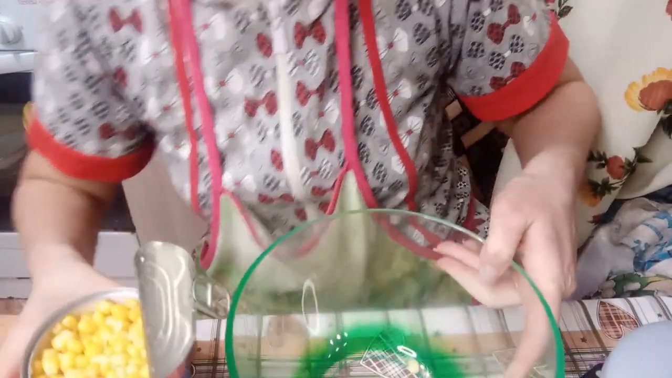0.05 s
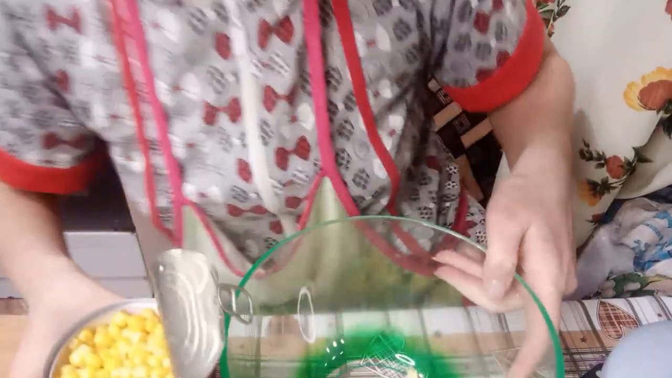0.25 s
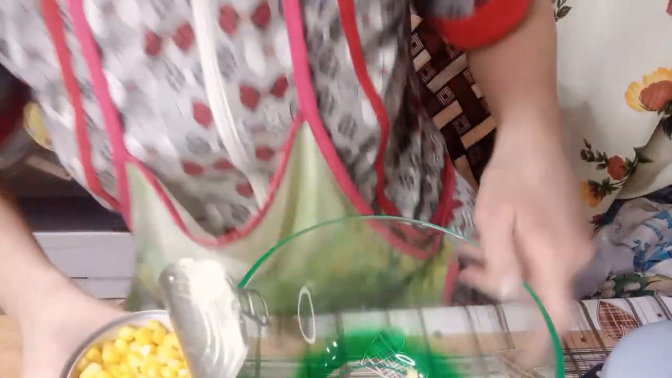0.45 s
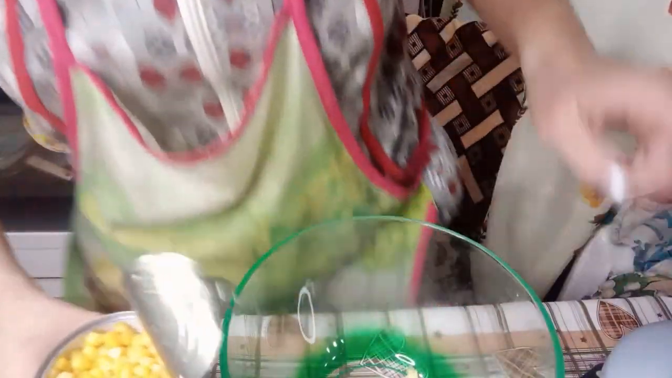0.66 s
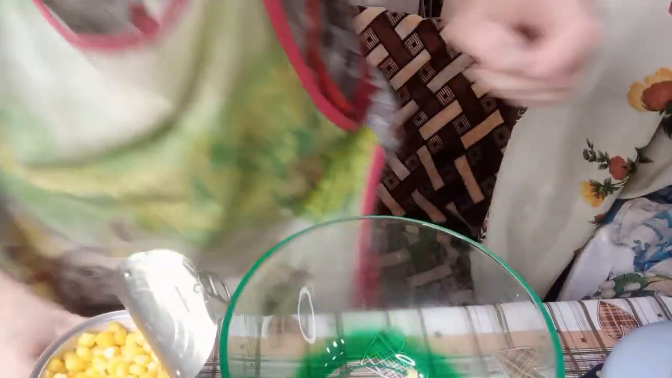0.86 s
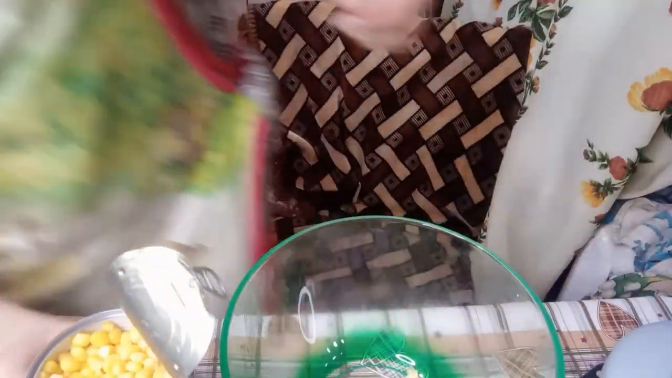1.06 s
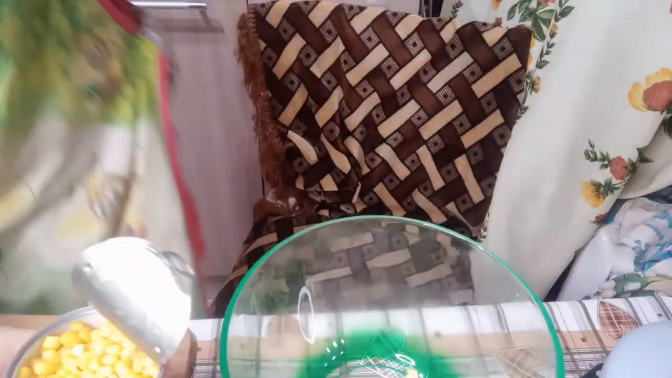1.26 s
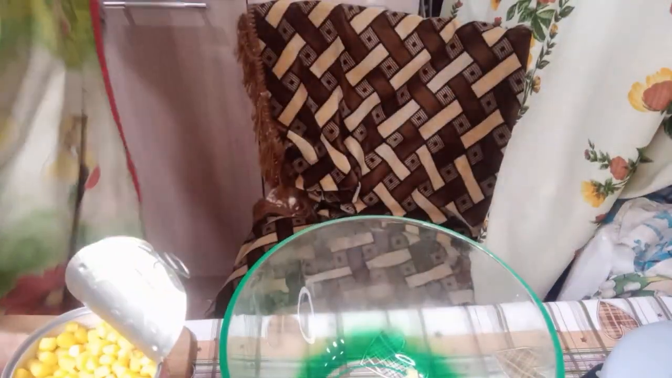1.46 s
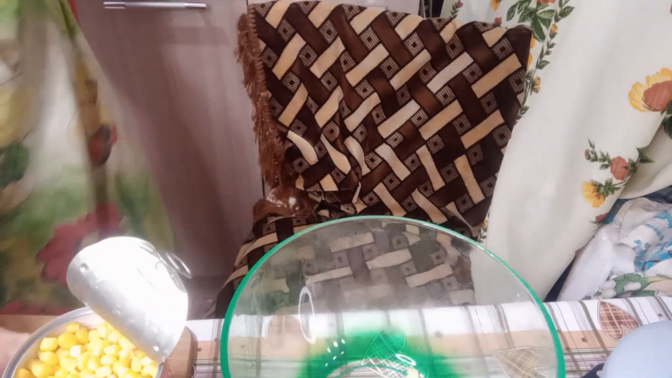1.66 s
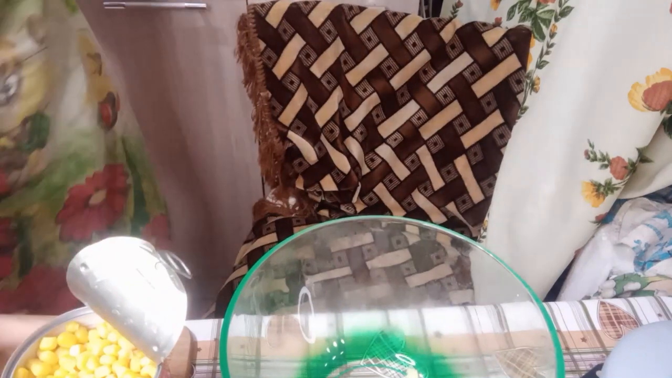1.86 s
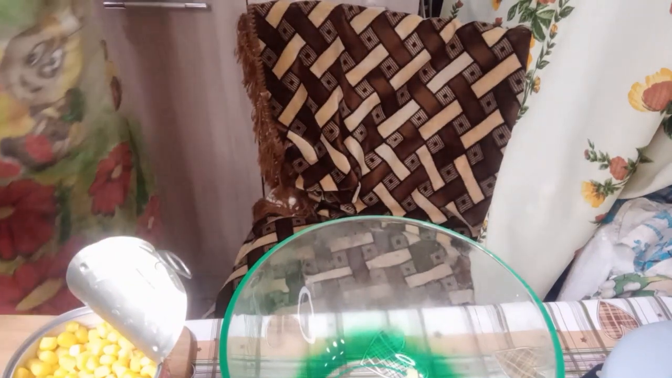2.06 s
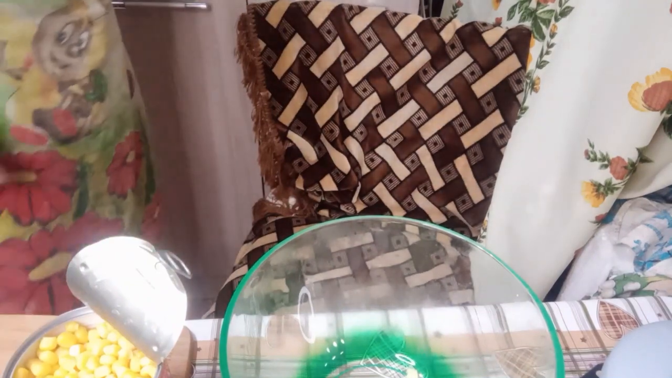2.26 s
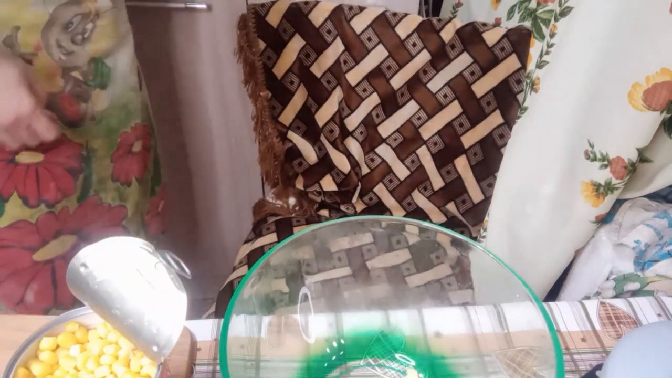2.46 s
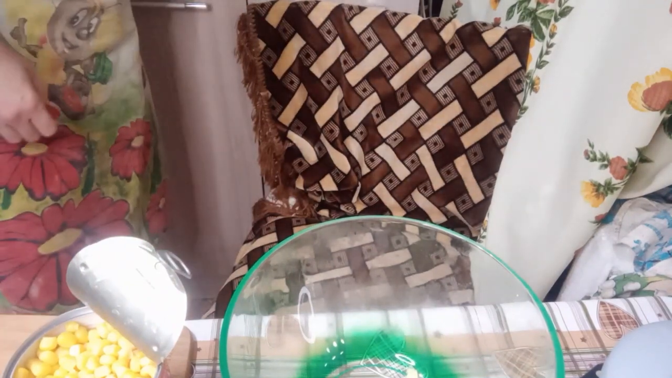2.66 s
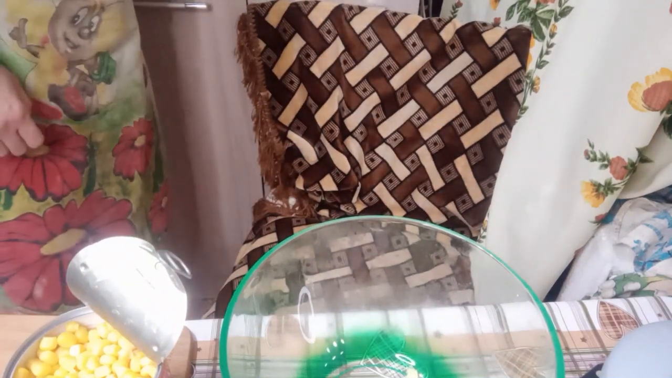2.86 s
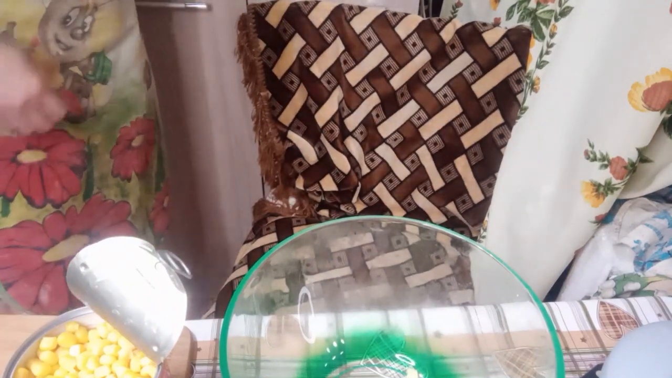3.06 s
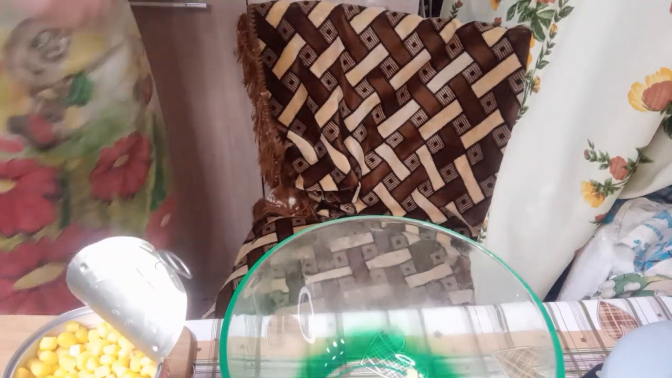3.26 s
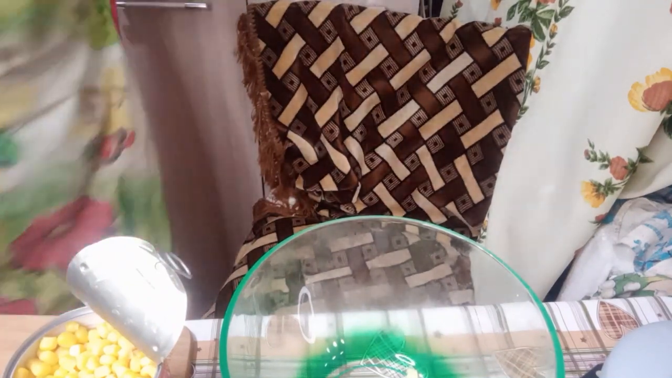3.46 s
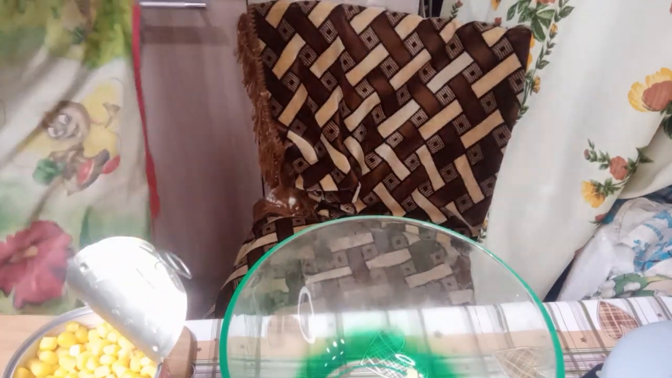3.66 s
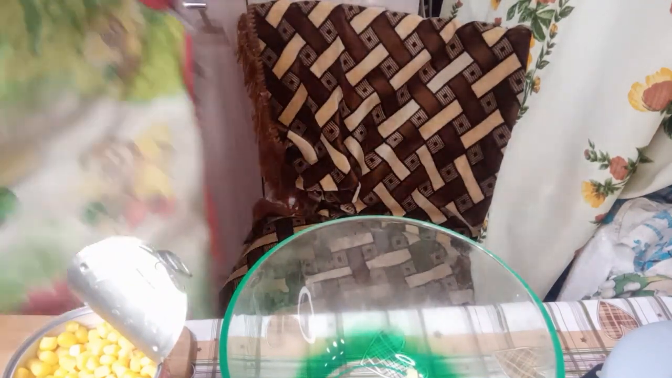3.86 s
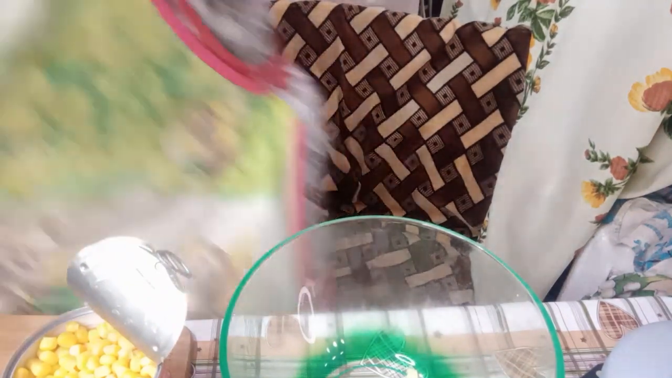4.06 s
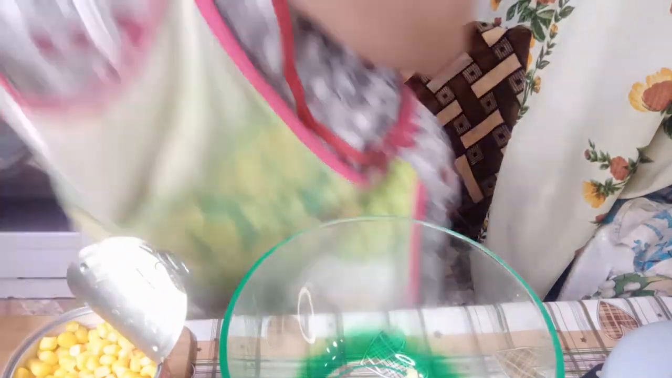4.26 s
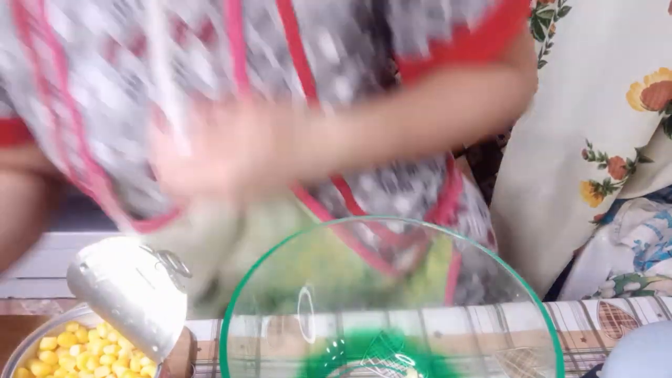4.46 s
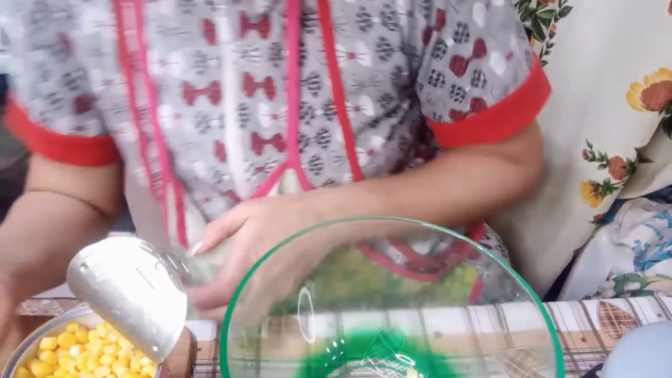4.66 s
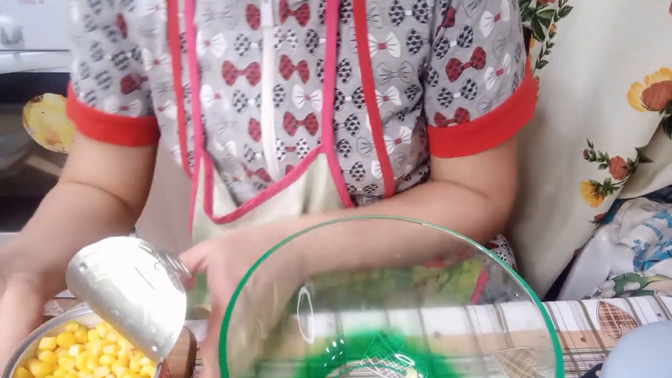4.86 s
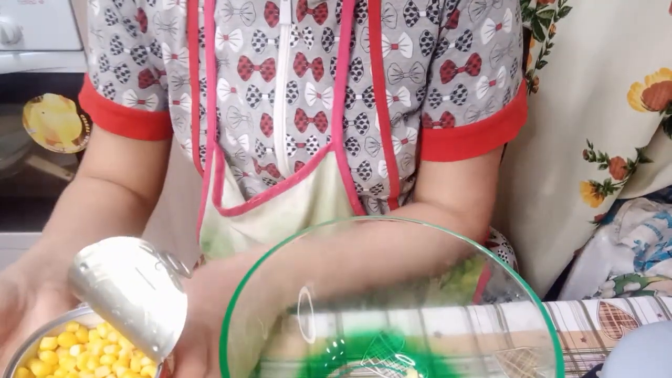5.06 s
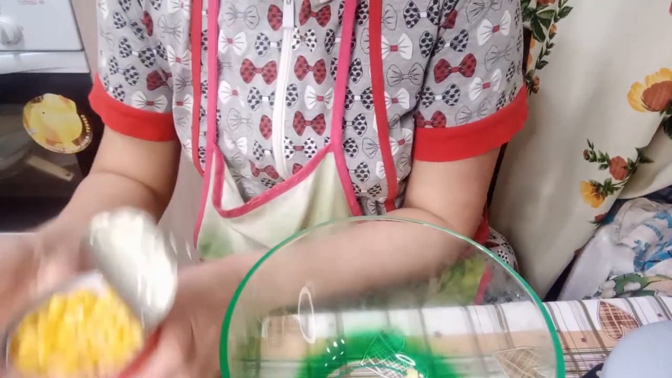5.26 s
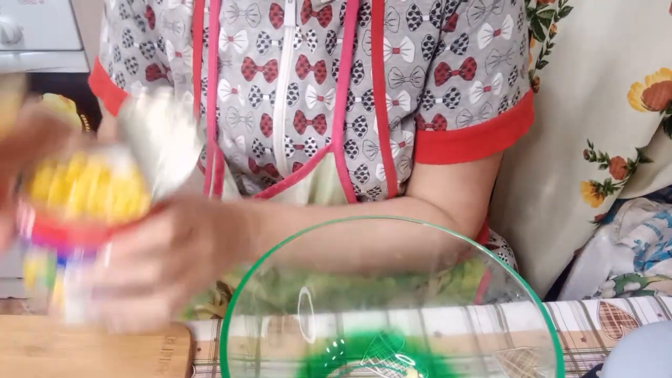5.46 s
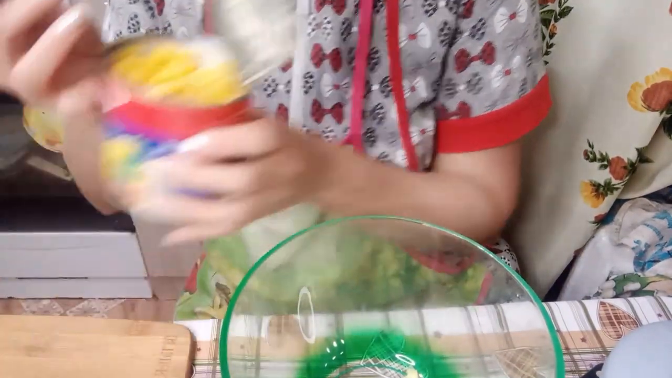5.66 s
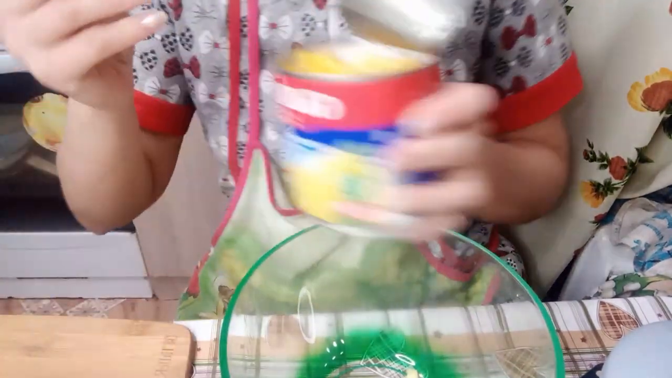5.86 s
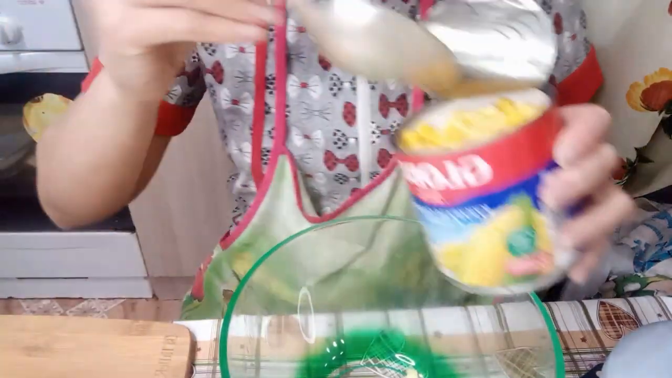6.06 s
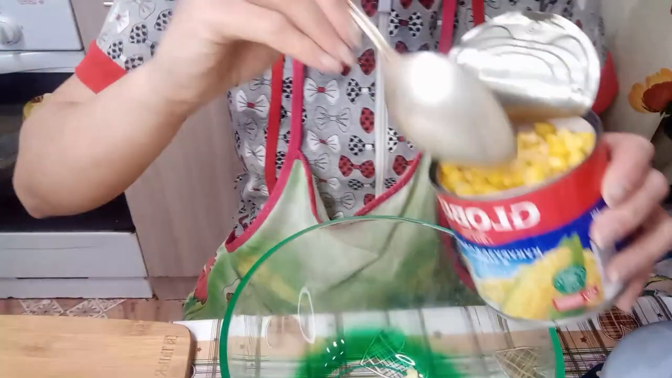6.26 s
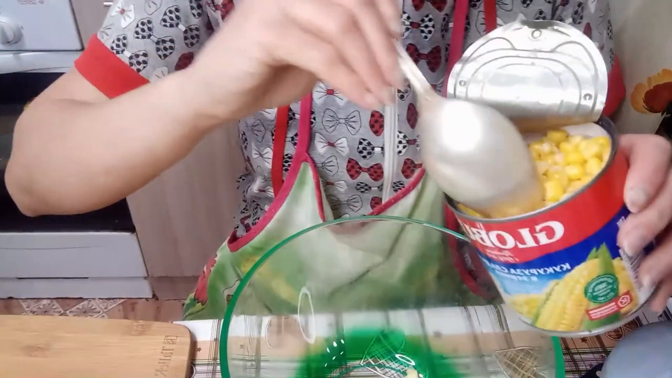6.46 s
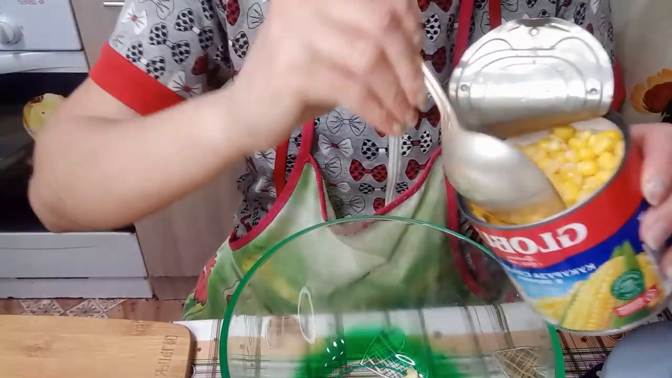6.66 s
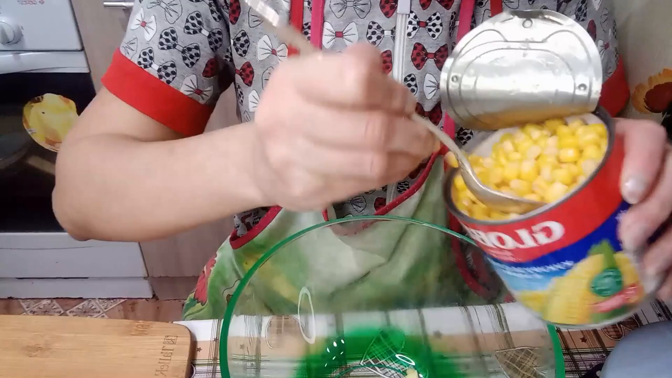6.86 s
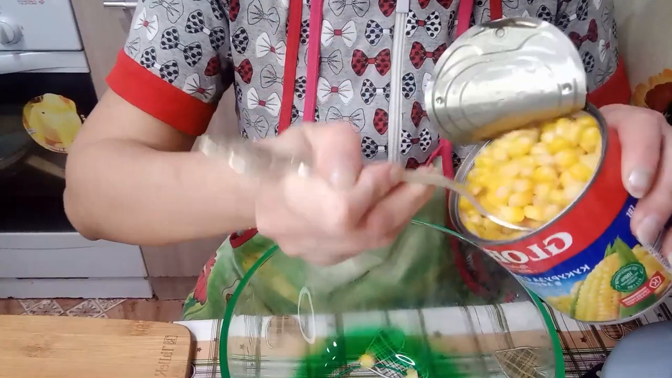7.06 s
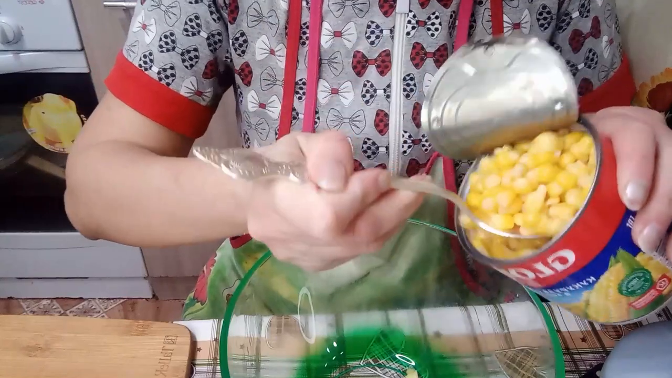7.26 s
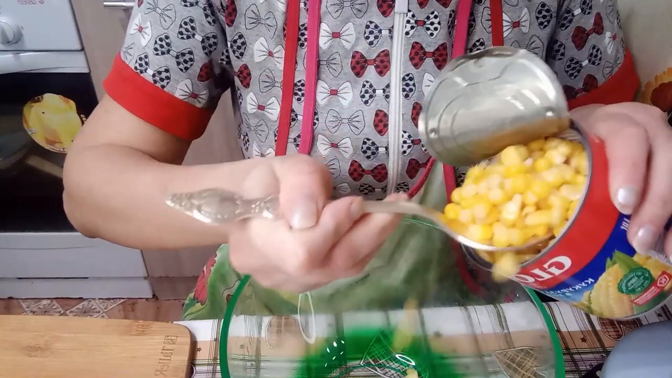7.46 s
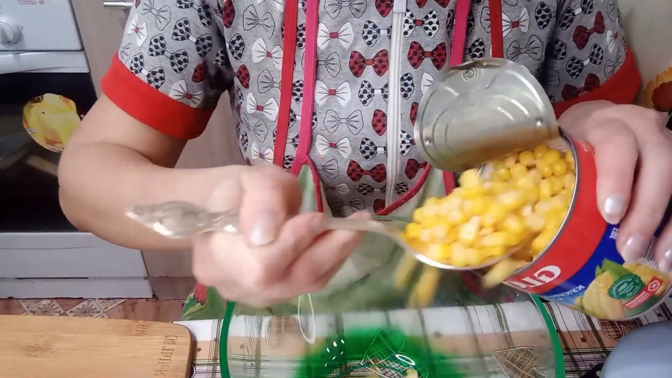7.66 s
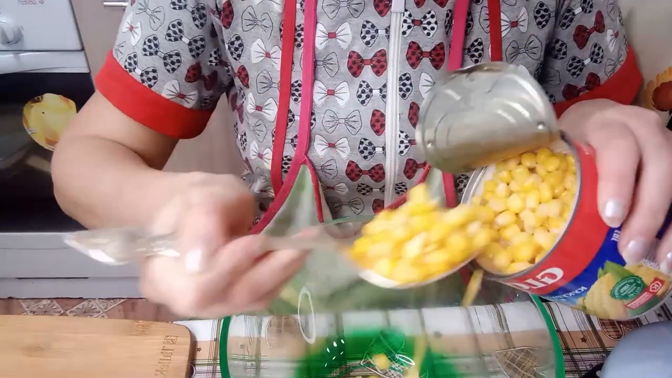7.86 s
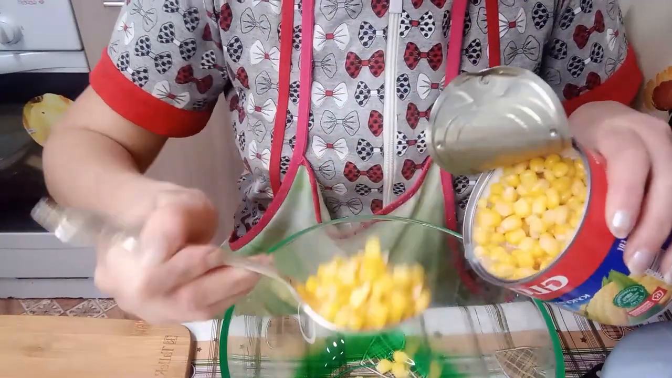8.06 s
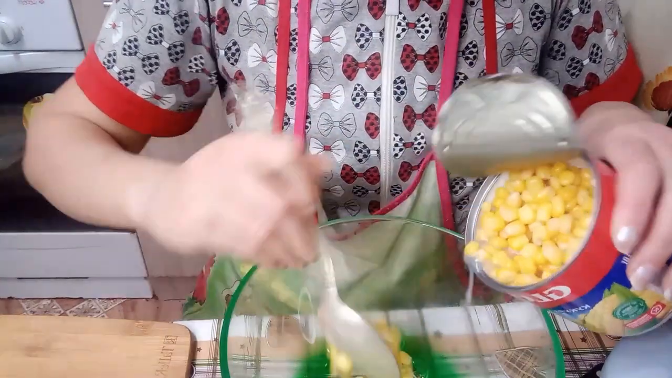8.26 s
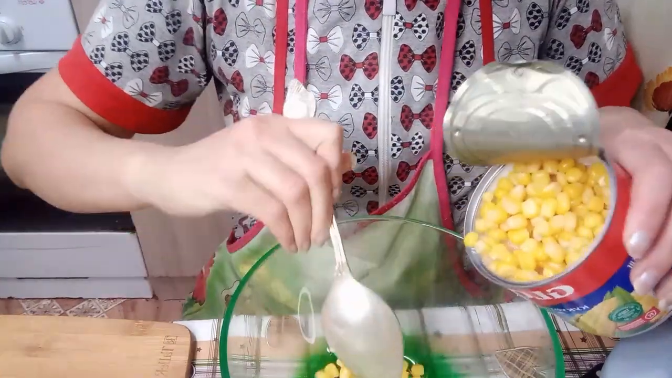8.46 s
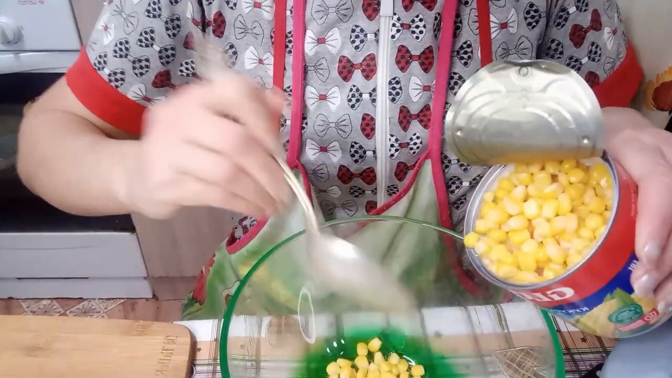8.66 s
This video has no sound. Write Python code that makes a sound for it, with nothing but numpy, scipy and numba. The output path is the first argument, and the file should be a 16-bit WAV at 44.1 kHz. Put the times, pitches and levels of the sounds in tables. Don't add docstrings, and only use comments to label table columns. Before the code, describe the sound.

A seat slides and knocks, cutlery rattles sharply in a drawer, then a spoon raps a full tin and soft kernels thump into a glass bowl.

```python
import sys
import numpy as np
from scipy import signal
from scipy.fft import rfft, irfft
from scipy.io import wavfile
from scipy.ndimage import uniform_filter1d
from numba import njit

SR = 44100
rng = np.random.default_rng(int(sys.argv[2]) if len(sys.argv) > 2 else 0)


def generate_wav(sig):
    pcm = np.round(np.clip(np.atleast_2d(sig).T, -1, 1) * 32767).astype(np.int16)
    wavfile.write(sys.argv[1], SR, pcm)


def boost(x):
    u = np.asarray(x, float) / 20
    return 10 ** u


N = 384375
T = np.arange(N) / SR

# (time [s], level [dB])
HUSH = [(15, -33.5), (25, -7), (123, -3.5), (219, -5.5), (342, -11), (1300, -21.5), (4690, -37.5),
        (13000, -34.5)]
HUSH_DRIFT = [(0, 14), (1.5, 1.5), (3.0, 5.5), (3.1, -5), (3.35, 3), (3.6, 3), (3.72, 4.5), (4.3, 3),
              (5.7, 2), (6.1, 1.5), (7.0, 1.5), (8.3, 3.5), (8.6, -0.5)]
# (peak time [s], level [dB], rise [s], fall [s], hollow pitch [Hz])
SLIDES = [(0.0, -39, .05, 0.13, 318), (.19, -49.5, 0.17, 0.071, 322), (.35, -44, 0.021, 0.26, 620),
          (.74, -66, 0.43, 0.38, 583), (1.018, -41.5, 0.07, 0.23, 800), (1.09, -44.5, 0.071, 0.14, 365),
          (1.17, -42.5, 0.052, 0.068, 570), (1.295, -42, 0.07, 0.11, 385), (1.37, -59.5, 0.029, 0.066, 323),
          (1.626, -38, 0.0068, 0.1, 840), (1.708, -31, 0.026, 0.18, 252), (1.76, -49, .04, 0.06, 570),
          (1.91, -37.5, 0.022, 0.074, 586), (2.01, -40.5, 0.033, 0.12, 169.2), (2.09, -44, 0.13, 0.3, 227),
          (2.13, -48, 0.067, 0.087, 293), (2.19, -44, 0.14, 0.05, 477), (2.34, -50, 0.089, 0.082, 478),
          (2.886, -54.5, 0.16, 0.31, 631), (3.92, -51, 0.069, 0.11, 240), (4.085, -44, 0.064, 0.14, 251),
          (4.46, -39.5, 0.035, 0.067, 467), (4.66, -57.5, 0.13, 1, 290), (5.17, -42.5, 0.14, 0.058, 462),
          (5.62, -55.5, 0.17, 0.11, 178.7)]
# (peak time [s], level [dB], rise [s], fall [s], cloth share [dB])
SCUFFS = [(0.0, -48, .05, 0.21, -15), (.18, -50, 0.048, 0.14, -8.5), (.35, -51, 0.14, 0.097, -2),
          (0.428, -44, 0.21, 0.058, -18), (.57, -55, 0.18, 0.28, -11.5), (.8, -61.5, 0.96, 0.32, -8.5),
          (1.018, -46, 0.096, 0.53, -12.5), (1.161, -51, 0.016, 0.11, 3), (1.269, -52, 0.03, 0.1, 4.5),
          (1.695, -37, 0.017, 0.13, -6.5), (1.79, -45, 0.2, 0.11, -5.5), (2.176, -57, 0.2, 0.079, -4),
          (2.392, -53.5, 0.23, 0.14, -2.5), (2.78, -59.5, 0.033, 0.77, -2.5),
          (2.95, -64.5, 0.31, 0.12, -19), (3.17, -71, 0.087, 0.32, -5.5), (3.35, -66.5, 0.15, 0.73, -7),
          (3.53, -66.5, 0.273, 0.21, -5.5), (3.899, -58, 0.058, 0.56, -11.5),
          (4.075, -49, 0.047, 0.17, 1.5), (4.196, -48.5, 0.18, 0.05, -9), (4.32, -68.5, 0.048, 0.2, 2.5),
          (4.42, -52, 0.0085, .08, -15), (4.46, -35, 0.014, 0.073, -13), (4.698, -60, 0.57, 0.6, -4),
          (4.85, -61.5, 0.46, .5, -7), (5.32, -71.5, 0.16, 0.62, -1), (5.548, -73.5, .3, 0.4, -4),
          (5.159, -46, 0.19, 0.075, -9.5), (4.959, -57, 0.1, 0.29, -3), (5.41, -72.5, 0.14, 0.089, 9)]
# (peak time [s], level [dB], fall [s])
STEPS = [(.18, -48, 0.18), (.43, -48, 0.15), (0.562, -61, 0.071), (0.938, -58, 0.14), (1.09, -42, 0.32),
         (1.33, -40.5, 0.02), (1.713, -39.5, 0.13), (2.04, -53, 0.096), (2.25, -54, 0.75),
         (2.46, -45, 0.26), (3.92, -59.5, 0.18), (4.08, -52, .13), (4.46, -52, 0.17), (4.979, -50.5, 0.12),
         (5.128, -50.5, 0.37), (5.588, -53.5, 0.12), (6.039, -62, 0.028), (6.209, -53.5, .06)]
# (frequency [Hz], level [dB])
RUMBLE = [(90, -21.5), (170, 1), (500, -7), (900, -4.5), (1400, -33)]
RUB = [(500, -29.5), (900, 2.5), (2000, -1), (4000, -10.5), (6000, -34)]
RUSTLE = [(2800, -20), (4200, 2), (7000, 0.5), (10000, -2), (15000, -15)]
THUMP = [(30, -29), (60, 0.5), (120, 3), (170, 4.5), (260, -42)]
# (time [s], peak [dB], body pitch [Hz], crack [dB], time to fade 60 dB [s])
KNOCKS = [(0.274, -25.5, 991, -21.5, 0.05), (0.327, -34, 1185, -32, 0.04), (.396, -35, 1500, -45, 0.045),
          (0.544, -24, 750, -50, 0.055), (1.622, -29, 900, -55, 0.06), (1.693, -28.5, 703, -13.5, 0.059),
          (1.701, -21.5, 585, -21, 0.091), (1.713, -22.5, 390, -27, 0.048), (1.727, -34, 595, -18, 0.024),
          (2.001, -35, 150, -55, 0.19), (4.419, -45.5, 880, -35, 0.11), (4.451, -39, 1048, -18.5, 0.049),
          (5.135, -32, 695, -35, 0.11), (5.155, -34, 800, -30, .1)]
# (time [s], peak [dB])
BUMPS = [
    (0.275, -26.5),
    (.328, -36),
    (0.544, -24),
    (1.622, -27),
    (1.896, -33.5),
    (4.066, -44),
]
# (frequency [Hz], level [dB], time to fade 60 dB [s])
LID = [(2290, 4, 0.15), (3542, -6, 0.1), (4693, 0.0, 0.23), (6540, -27, 0.07), (7920, -1, 0.069),
       (8300, -16, 0.35), (9100, -5.5, 0.14), (11200, -8, 0.077)]
SEAT = [(144, -6.5, 0.26), (385, -7, 0.18), (598, 3.5, 0.12), (947, -8, 0.13), (1140, -4, 0.11),
        (1306, -2, 0.046), (2150, -16, 0.02)]
DOOR = [(450, -2, 0.059), (750, -11, .05), (862, 1, 0.14), (930, -6, 0.032), (1040, -4.5, 0.14),
        (1405, -8, 0.12), (1580, -12, 0.21), (1680, -8, 0.026)]
CATCH = [(473, -15, 0.11), (585, 5.5, .2), (695, 2, 0.19), (800, -12, 0.16)]
# (time [s], peak [dB], pitch [Hz])
TICKS = [(.386, -32, 2800), (1.4245, -49, 3300), (3.945, -52.5, 4970), (4.62, -47, 7270),
         (4.621, -43.5, 1105), (5.65, -58, 4520), (5.65, -48, 8210), (6.632, -49, 1555), (6.655, -58, 6060),
         (6.762, -62, 1260), (6.7281, -56.5, 8320), (6.8865, -62.5, 5340)]
# (time [s], level [dB], hold [s], fall [s], tray level [dB])
RATTLES = [(2.4, -33.5, 0.03, 0.077, -2.5), (2.45, -39.5, 0.022, 0.1, -8),
           (2.486, -32.5, 0.0055, .04, -11.5), (2.493, -26.5, .012, 0.045, -10),
           (2.506, -32.5, 0.013, 0.084, -10), (2.568, -43, 0.016, 0.078, -9),
           (2.63, -24.5, 0.0059, 0.03, -17.5), (2.634, -23, 0.012, .025, -21),
           (2.65, -28.5, .006, .03, -21), (2.666, -16.5, 0.011, 0.06, -25),
           (2.685, -18.5, 0.02, 0.045, -12.5)]
# (time [s], peak [dB])
CLINKS = [
    (2.496, -16),
    (2.637, -5),
    (2.666, 1.5),
]
# (frequency [Hz], level [dB], time to fade 60 dB [s])
CUTLERY = [(3025, -5, 0.19), (3155, -1, 0.14), (4328, -10, 0.17), (5588, -4, 0.12), (7693, -13, 0.24),
           (9135, -2, 0.13), (9545, -1, 0.15), (9884, -7, 0.13), (11320, -7, 0.16), (12280, -4, 0.14),
           (13410, -11, 0.18), (14590, -7, 0.14), (15115, -10, 0.2)]
# (time [s], share [0-1])
FREE_RING = [(2.4, 0.06), (2.6, 0), (2.63, 0), (2.66, .3), (2.7, 0), (2.78, 0.03)]
# (frequency [Hz], level [dB])
TRAY_SHADOW = [(3900, 2), (4600, -1.5), (4800, -17), (5000, -2), (6000, -1.5)]
# (frequency [Hz], level [dB])
DRAWER_SIDE = [(60, 0), (110, -2), (200, -1), (380, 1), (700, 0.5), (1290, -1), (2380, 1), (4400, 3.5),
               (8120, -7), (15000, 1.5)]
# (peak time [s], level [dB], rise [s], fall [s])
GRIPS = [(4.85, -61.5, 0.17, 0.29), (5.16, -55, 0.12, 0.096), (5.35, -69.5, 0.17, .4), (5.56, -71, .3, .2)]
# (frequency [Hz], width [Hz], level [dB])
WALL = [(950, 90, 0), (1550, 130, -1), (1950, 55, -10.5), (2845, 70, -5), (3550, 90, -15), (4380, 120, -7)]
# (peak time [s], level [dB], rise [s], fall [s])
WHISPERS = [(4.97, -69, .05, 0.23), (5.14, -66, 0.14, .1), (5.42, -67, .15, .06)]
# (time [s], peak [dB], spoon ring [dB], snap [dB])
TAPS = [
    (6.263, -6.5, -22.5, -27),
    (6.324, -15, -22.5, -22.5),
    (6.431, -18, -22.5, -38.5),
]
# (frequency [Hz], level [dB], time to fade 60 dB [s])
TIN = [(93, -10, 0.03), (150, -6.5, 0.049), (230, 6, 0.04), (332, -18.5, 0.16), (492, -13.5, 0.082),
       (571, -25, 0.16), (616, -25.5, 0.069), (811, 9.5, 0.02), (900, -12, 0.025), (1560, 6, 0.027),
       (1695, -22.5, 0.083)]
SPOON = [(2560, -1.5, 0.38), (3900, -21, 0.28), (5500, -14.5, .15), (5520, -13.5, 0.15), (5770, -21.5, .1),
         (6050, -23.5, .1), (7410, -11.5, 0.1), (8000, -6.5, 0.1), (8600, -21, .06), (9050, -15.5, .1),
         (9450, -13.5, .09), (11050, -19.5, .06)]
# (time [s], slip rate [Hz], level [dB])
SQUEAK = [(6.53, 559, -58), (6.556, 548, -63), (6.574, 583.9, -60), (6.62, 532.6, -58), (6.672, 524, -58.5),
          (6.745, 579, -55), (6.765, 585, -72)]
# (peak time [s], level [dB], rise [s], fall [s])
SIZZLES = [
    (6.645, -72, 0.0598, 0.067),
    (8.24, -65, 0.054, 0.12),
]
HEAPS = [(7.17, -64, .12, 0.19), (7.76, -43.5, 0.22, 0.28), (8.238, -40.5, 0.023, 0.16)]
# (time [s], peak [dB], glass [dB], thump pitch [Hz])
DROPS = [(6.983, -31, -49, 287.3), (7.129, -52, -47, 554), (7.44, -40, -24, 240), (7.55, -36.5, -38, 286.4),
         (7.614, -33.5, -33, 274), (7.659, -23.5, -47, 278), (7.729, -34, -36, 266.5),
         (7.809, -29, -31, 272), (7.839, -37.5, -45, 363), (7.887, -31.5, -35, 269.5),
         (8.005, -37, -52.5, 255), (8.095, -32.5, -54, 109.4), (8.207, -33.5, -38, 272),
         (8.223, -26.5, -47, 261.6), (8.239, -33, -42, 280), (8.285, -32, -34, 254), (8.513, -49, -47, 118)]
# (frequency [Hz], level [dB], time to fade 60 dB [s])
BOWL = [(107, -0.5, 0.033), (168.5, -11.5, 0.11), (274, -3, 0.13), (352, -6, 0.063), (422.5, -3, 0.031),
        (504, -0.5, 0.053), (554, -6, 0.095), (620, -20, 0.07), (721, -1.5, 0.088), (777, -5, 0.047),
        (920, -12, 0.048)]
GLASS = [(5950, -6.5, 0.13), (8382, -12, .11), (9518, -15, .09)]
# (time [s], peak [dB], pitch [Hz])
SNAPS = [(7.44, -53.5, 5900), (7.552, -60, 1500), (7.69, -67, 2600), (7.89, -65, 1600), (8.096, -55, 1300),
         (8.218, -52, 1690), (8.242, -60, 1503), (7.447, -48.5, 10040), (7.662, -34.5, 15100),
         (7.663, -65, 8340), (7.662, -42, 3000), (7.811, -54, 13000), (7.837, -48.5, 9600),
         (7.838, -63.5, 3500), (7.96, -66, 10950), (8.007, -51, 3150), (8.207, -64, 13000),
         (8.225, -59, 3300), (8.221, -49.5, 14700), (8.238, -42.5, 9100), (8.251, -52, 14500),
         (8.252, -62, 8480), (8.28, -50, 9100), (8.283, -58, 5000), (8.349, -58, 5840)]
# (time [s], frequency [Hz], level [dB], time to fade 60 dB [s])
PINGS = [(7.442, 9430, -64, .06), (7.66, 8382, -53.5, 0.11), (7.813, 9518, -64, 0.19),
         (7.838, 8382, -65, .1)]
# (frequency [Hz], share [0-1])
LIKENESS = [(30, .5), (60, 0.31), (125, .93), (250, 0.66), (500, 0.84), (1000, 0.18), (4000, 0.031)]
# (frequency [Hz], time to fade 60 dB [s])
ROOM_T60 = [(100, 0.57), (250, 0.099), (500, 0.18), (2000, 0.18), (10000, 0.033)]
# (frequency [Hz], level [dB])
PORT = [(20, -18), (45, -9), (80, -2), (6300, 1.5), (6650, 1), (6800, -11.5), (6950, -3), (7300, -1.5),
        (11200, -2.5), (12000, -8), (13000, -0.5), (13800, -16.5), (14500, 5.5), (15600, 12),
        (16100, -42.5), (22000, -66.5)]


def along(table, hz):
    f, v = np.transpose(table)
    return np.interp(np.log(np.maximum(hz, 1)), np.log(f), v)


def colour(x, table):
    size = x.shape[-1]
    hz = np.arange(size // 2 + 1) * SR / size
    return irfft(rfft(x) * boost(along(table, hz)), size)


def unit(x):
    return x / np.sqrt(np.mean(x ** 2))


def ports(mid, side):
    size = len(mid)
    like = np.clip(along(LIKENESS, np.arange(size // 2 + 1) * SR / size), 0, 1)
    mid = rfft(mid) * np.sqrt(1 + like)
    side = rfft(side) * np.sqrt(1 - like)
    return irfft(np.array([mid + side, mid - side]), size)


def grains(spread_db, share):
    big = boost(spread_db * np.minimum(rng.exponential(size=N), 3))
    return np.where(rng.random(N) < share, big, 1)


def grit(spread_db, share, lag=0):
    left, right = ports(*rng.standard_normal((2, N)) * grains(spread_db, share))
    return np.array([np.roll(left, lag), right])


def flicker(rate):
    k = int(SR / rate)
    steps = np.repeat(rng.standard_normal(N // k + 1), k)
    return unit(uniform_filter1d(uniform_filter1d(steps, k), k)[:N])


def gain(rows, column):
    fade_s = 0.053
    rows = np.array(rows)
    first, last = rows[0, 0], rows[-1, 0]
    gate = np.interp(T, [first - fade_s, first, last, last + fade_s], [0, 1, 1, 0])
    return boost(np.interp(T, *rows.T[[0, column]])) * gate


def swells(rows):
    power = 0
    for s, db, rise, fall, *rest in rows:
        hold = rest[0] if rest else 0
        away = np.maximum((s - T) / rise, np.maximum(T - s - hold, 0) / fall)
        power = power + boost(db - 20 * away) ** 2
    return np.sqrt(power)


def ring(modes, scatter_db, contact_s):
    t = np.arange(SR // 2)[:, None] / SR
    hz, db, t60 = np.transpose(modes)
    chance = rng.standard_normal((2, len(hz)))
    fading = boost(db + scatter_db * chance[0] - 60 * t / t60)
    waves = fading * np.sin(2 * np.pi * hz * t + .5 * chance[1])
    x = waves.sum(axis=1) * (1 - np.exp(-t[:, 0] / contact_s)) ** 2
    return x / np.abs(x).max()


def cluster(hz, octaves, t60, count):
    spread = np.linspace(-2, 2, count) + 0.051 * rng.standard_normal(count)
    return np.c_[hz * 2 ** (octaves * spread), -3.0 * spread ** 2, t60 * 2 ** (-.4 * spread)]


def crack(decay_s, table, rise_s=1e-4):
    t = np.arange(SR // 2) / SR
    x = colour(rng.standard_normal(SR // 2), table)
    x = x * np.exp(-t / decay_s) * (1 - np.exp(-t / rise_s)) ** 2
    return x / np.abs(x).max()


@njit
def sweep(x, hz, q):
    y, b, l = np.empty(len(x)), 0., 0.
    for i in range(len(x)):
        g = np.tan(np.pi * hz[i] / SR)
        v = (b + g * (x[i] - l)) / (1 + g * (g + 1 / q))
        b, l, y[i] = 2 * v - b, l + 2 * g * v, v / q
    return y


def add(track, s, x):
    i = int(s * SR)
    track[i:i + len(x)] += x[:N - i]


def place(x, lag, pan_db, wet_db):
    t = np.arange(SR // 2) / SR
    tail = 0
    for hz in 90 * 2. ** np.arange(8):
        octave = [(hz / 2, -40), (hz / 1.4, -3), (hz, 0), (hz * 1.4, -3), (hz * 2, -40)]
        band = colour(ports(*rng.standard_normal((2, len(t)))), octave)
        tail = tail + band * boost(-60 * t / along(ROOM_T60, hz))
    tail = tail * (t > .002) / np.sqrt(np.sum(tail ** 2, axis=1, keepdims=True))
    echo = signal.fftconvolve(x[None], tail, axes=1)[:, :N]
    heard = np.array([np.roll(x, lag), x]) + boost(wet_db) * echo
    return heard * boost(np.array([[pan_db], [-pan_db]]) / 2)


def hush():
    level_db = -67 + np.interp(T, *np.transpose(HUSH_DRIFT)) + flicker(1.5)
    return unit(colour(grit(1.6, 0.01), HUSH)) * boost(level_db)


def patchy(sound, rows, uneven_db, rate):
    return unit(sound) * swells(rows) * boost(uneven_db * flicker(rate) - 0.5)


def slides():
    hollow_hz = np.interp(T, *np.transpose(SLIDES)[[0, 4]])
    wood = colour(grit(3.0, .05, lag=11), RUMBLE)
    hollow = np.array([sweep(sweep(x, hollow_hz, 1.0), hollow_hz, 1.0) for x in wood])
    rows = [(s, db, rise, fall) for s, db, rise, fall, _ in SLIDES]
    return patchy(0.13 * 0.24 * wood + 8.7 * hollow, rows, 2.5, 25)


def scuffs():
    soles = [(s, db, rise, fall) for s, db, rise, fall, _ in SCUFFS]
    cloth = [(s, db + cloth_db, rise, fall) for s, db, rise, fall, cloth_db in SCUFFS]
    rub = patchy(colour(grit(3.0, .05, lag=11), RUB), soles, 1.5, 30)
    return rub + patchy(colour(grit(3.0, .05, lag=11), RUSTLE), cloth, 1.5, 40)


def steps():
    rows = [(s, db, 0.029, fall) for s, db, fall in STEPS]
    return patchy(colour(grit(3.0, .05, lag=11), THUMP), rows, 1.5, 10)


def knocks():
    out = np.zeros(N)
    for s, db, hz, crack_db, t60 in KNOCKS:
        snap = crack(.003, [(1500, -20), (2800, 0), (6000, -3), (16000, -20)])
        snap = snap + .5 * ring(cluster(4000., 1.0, .07, count=36), 4.0, .0003)
        panel = ring(cluster(1.3 * hz, 0.91, t60, count=70), 0.75, 0.00045)
        add(out, s + 0.001, boost(db) * (panel + boost(crack_db + 17.0) * snap))
    return out


def bumps():
    out = np.zeros(N)
    for (s, db), modes in zip(BUMPS, (LID, LID, SEAT, DOOR, CATCH, CATCH)):
        damped = [(f, d, 0.56 * min(t, .2)) for f, d, t in modes]
        add(out, s, boost(db) * ring(damped, 1.0, 0.00065))
    return out


def ticks():
    out = np.zeros(N)
    for s, db, hz in TICKS:
        add(out, s, boost(db) * crack(0.0046, [(hz / 2, -26), (hz, 0), (hz * 1.23, -14), (hz * 2, -35)]))
    return out


def ringing_steel(hail):
    steel = 0
    for hz, db, t60 in CUTLERY:
        r = boost(-60 / (.25 * min(t60, .3) * SR))
        turn = 2 * np.pi * hz / SR
        tone = signal.lfilter([1 - r], [1, -2 * r * np.cos(turn), r * r], hail)
        steel = steel + boost(.5 * db) * tone * np.sin(turn)
    return unit(steel)


def scraping_steel(hail):
    scrape = colour(hail, [(800, -17.5), (2000, 2.0), (3100, -1.0), (4500, -5), (5800, 5.0), (6800, -4.5),
                           (9500, 3.5), (16000, -6.0)])
    drawer_open_s = 2.62
    return unit(np.where(T < drawer_open_s, colour(scrape, TRAY_SHADOW), scrape))


def tray(hail, rise_s):
    drone = swells([(s, db + tray_db, rise_s, 0.99 * fall, 0.66 * hold) for s, db, hold, fall, tray_db in RATTLES])
    return drone * unit(colour(hail, [(100, -18.5), (300, -8.5), (650, 7.0), (1500, -9.0), (2500, -22.0)]))


def cutlery():
    hail = rng.standard_normal(N) * grains(2.5, 0.11)
    rise_s = 0.003
    free = np.clip(np.interp(T, *np.transpose(FREE_RING)), 0, 1)
    steel = np.sqrt(free) * ringing_steel(hail) + np.sqrt(1 - free) * scraping_steel(hail)
    shake = swells([(s, db, rise_s, fall, hold) for s, db, hold, fall, _ in RATTLES])
    uneven = boost(0.81 * flicker(60) + 1.7 * flicker(500) - 1.5)
    out = uneven * (shake * steel + tray(hail, rise_s))
    for s, db in CLINKS:
        damped = [(f, d, 0.78 * min(t, .3)) for f, d, t in CUTLERY]
        add(out, s, boost(db - 7.5) * ring(damped, 1.3, 0.00013))
    return out


def grip():
    drag = rng.standard_normal(N) * grains(3.0, 0.028)
    wall = 0
    for hz, width, db in WALL:
        tone = sweep(drag, hz * (1 + .008 * flicker(5.5)), hz / width)
        wall = wall + boost(db + 2.5 * flicker(12)) * unit(tone)
    return unit(wall) * swells(GRIPS)


def whisper():
    return unit(colour(grit(3.0, .05, lag=9), [(9000, -30), (14000, 0)])) * swells(WHISPERS)


def tin():
    out = np.zeros(N)
    for s, db, _, snap_db in TAPS:
        snap = crack(0.0018, [(1000, -9.0), (4000, -18.5), (10000, -12.0), (14000, -24)])
        slosh = crack(0.023, [(50, -16), (200, 9), (1000, 1.5), (1800, -17), (2800, -22.0), (4500, -46.5),
                              (16000, -69.0)], .001)
        clank = 0.59 * ring(cluster(800., .7, 0.026, count=90), 1.3, 0.0012)
        clank = clank + 0.13 * ring(cluster(2200., 0.34, 0.042, count=30), 3.3, 0.00017)
        thud = 0.7 * ring(TIN, 0.6, 0.0028) + 0.34 * slosh
        add(out, s + 0.0011, boost(db) * (thud + clank + boost(snap_db) * snap))
    return out


def spoon_ring():
    out = 0
    for hz, db, t60 in SPOON:
        fed = swells([(s + 0.0041, tap_db + ring_db + db - 13.0, .002, t60 / 3) for s, tap_db, ring_db, _ in TAPS])
        twin_hz = hz + 3e-6 * hz ** 2 / 2
        pair = np.sin(2 * np.pi * hz * T) + boost(-7.0) * np.sin(2 * np.pi * twin_hz * T)
        out = out + fed * boost(hz / 1700 * flicker(45)) * pair
    return out


def squeak():
    slip_hz = np.interp(T, *np.transpose(SQUEAK)[:2]) * (1 + .025 * flicker(150))
    phase = 2 * np.pi * np.cumsum(slip_hz) / SR
    slips = 0
    for k, db in enumerate((0, -4, -22), start=1):
        slips = slips + boost(db + 3.5 * flicker(90)) * np.sin(k * phase)
    rasp = unit(colour(rng.standard_normal(N), [(600, -24.0), (1000, 6), (1600, -12), (2200, -27)]))
    return gain(SQUEAK, 2) * (unit(slips) + boost(-9.0) * rasp)


def juice():
    spray = rng.standard_normal(N) * grains(8.7, 0.022)
    return unit(colour(spray, [(1200, -10.0), (3000, -6.5), (8000, 1.0), (16000, -1)])) * swells(SIZZLES)


def kernel_snap(hz):
    return crack(0.0022, [(hz / 4, -20), (hz / 1.55, -5), (hz, 0), (hz * 1.13, -6), (hz * 3, -24)])


def drops():
    out = np.zeros(N)
    for s, db, glass_db, hz in DROPS:
        tick = boost(-59) * kernel_snap(5900)
        wall = [(f, d - 6.3 * np.log2(f / hz) ** 2, t) for f, d, t in BOWL]
        soft = crack(0.026, [(0.18 * hz, -20), (hz, 0), (2 * hz, -2), (3.38 * hz, -7), (3.66 * hz, -20),
                             (7 * hz, -28), (16000, -70)], 0.0014)
        thump = 0.63 * ring(wall, 1.5, 0.0012) + 0.44 * soft
        glass = boost(glass_db + 2.0) * ring(GLASS, 3.3, 0.00042)
        add(out, s, boost(db) * (thump + tick + glass))
    return out


def heaps():
    hits = rng.standard_normal(N) * (rng.random(N) < .004)
    patter = signal.fftconvolve(hits, ring(cluster(437.5, 0.554, 0.047, count=50), 0.58, 0.013))[:N]
    return unit(patter) * swells(HEAPS)


def snaps_and_pings():
    out = np.zeros(N)
    for s, db, hz in SNAPS:
        add(out, s, boost(db) * kernel_snap(hz))
    for s, hz, db, t60 in PINGS:
        add(out, s, boost(db) * ring([(hz, 0, t60)], 0, .0004))
    return out


def scene():
    steel = cutlery()
    wide = [colour(x, [(f, side * db) for f, db in DRAWER_SIDE])
            for x, side in zip(ports(steel, cutlery()), (.5, -.5))]
    drawer = boost(-12.0) * place(steel, 12, .3, 4.1) + boost(-2.5) * np.array(wide)
    furniture = place(knocks() + bumps() + ticks(), 9, -0.48, -6.5)
    tin_and_spoon = place(tin() + spoon_ring() + squeak() + grip(), 0, .3, -8.5)
    bowl = place(juice() + drops() + heaps() + snaps_and_pings(), 0, 2.0, -7.5)
    moves = slides() + scuffs() + steps() + whisper()
    return drawer + furniture + tin_and_spoon + bowl + moves + hush()


def roll_off(x):
    return signal.sosfilt(signal.butter(12, 16960, fs=SR, output="sos"), x)


def record(dry):
    mix = np.tanh(colour(dry, PORT))
    return roll_off(mix)


dry = scene()
out = record(dry)
generate_wav(out)
```